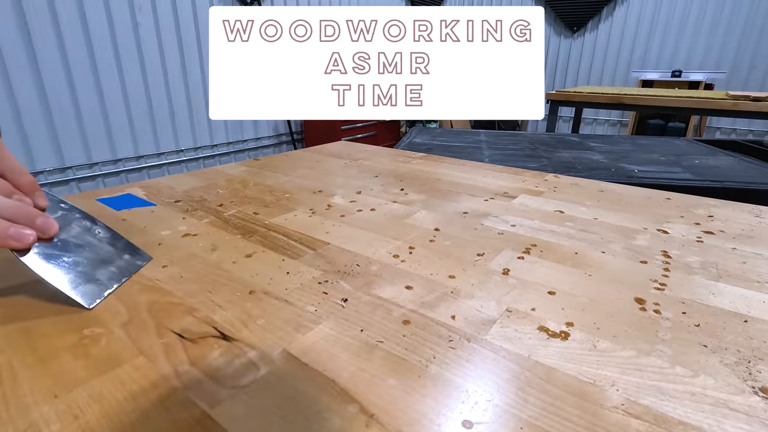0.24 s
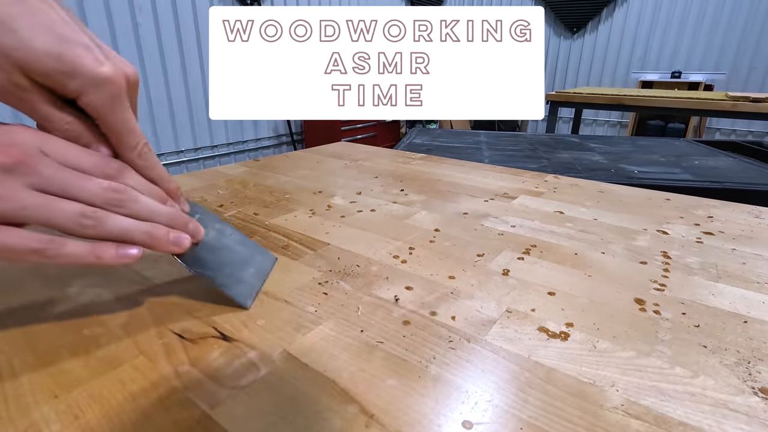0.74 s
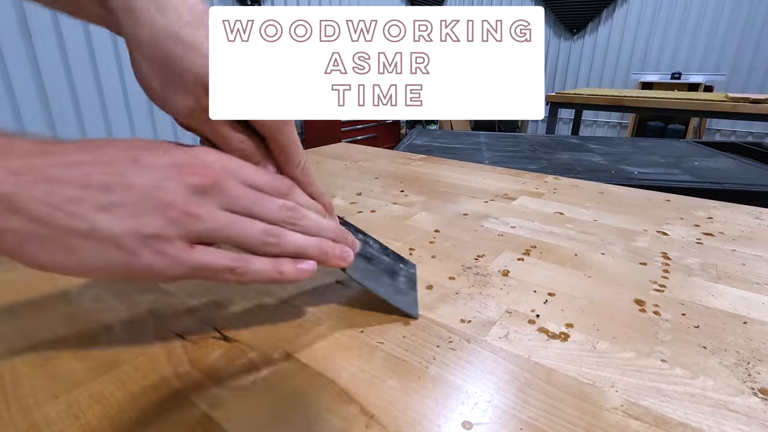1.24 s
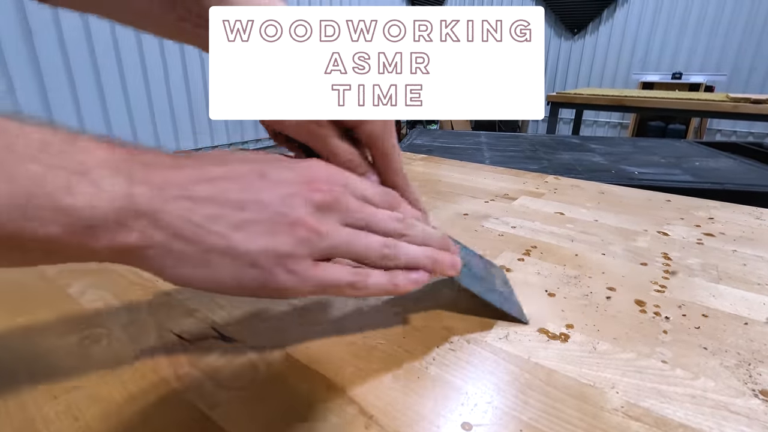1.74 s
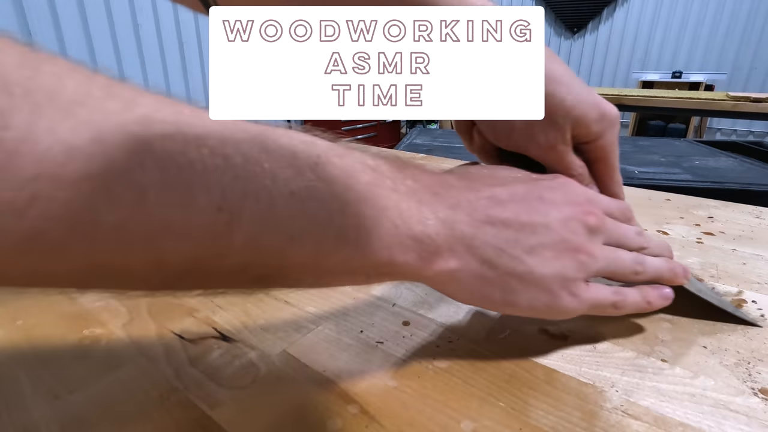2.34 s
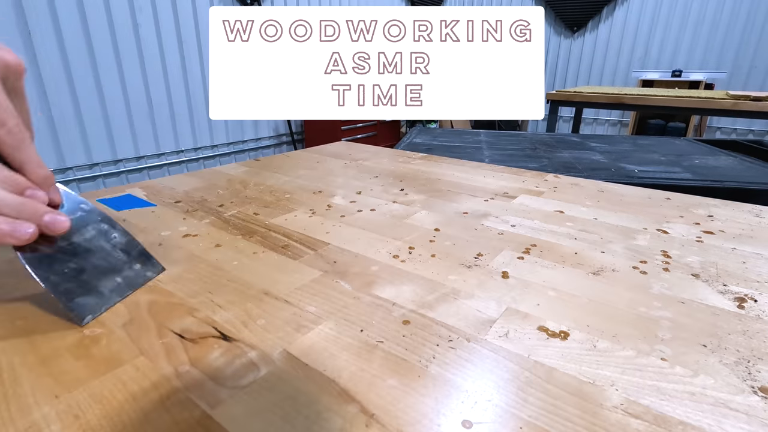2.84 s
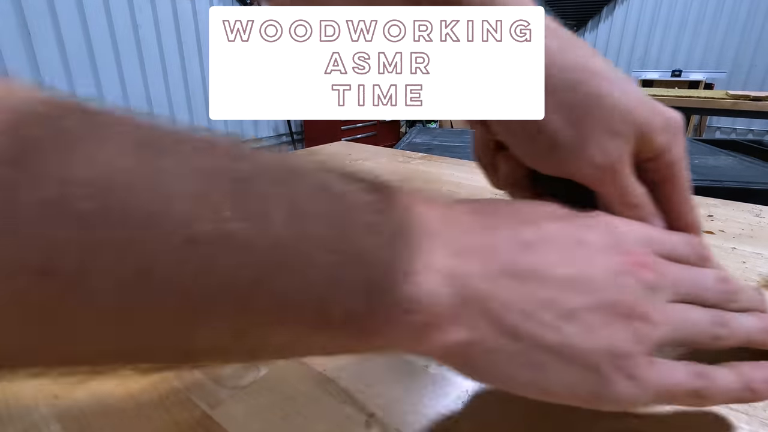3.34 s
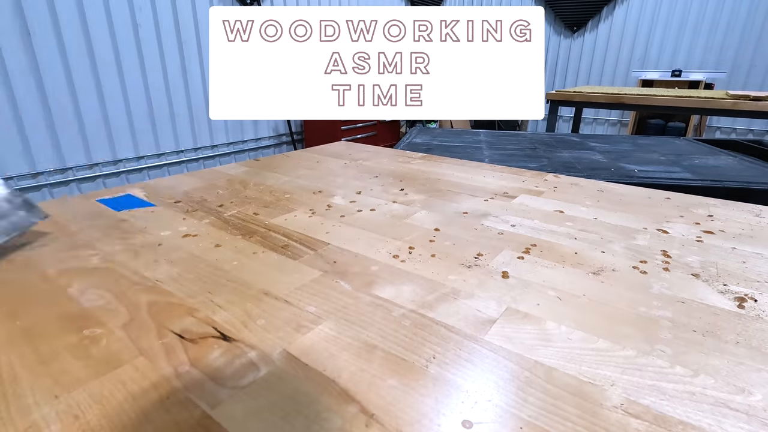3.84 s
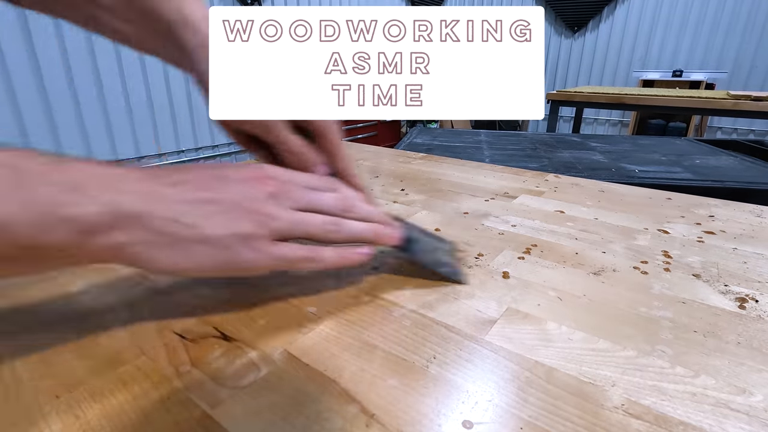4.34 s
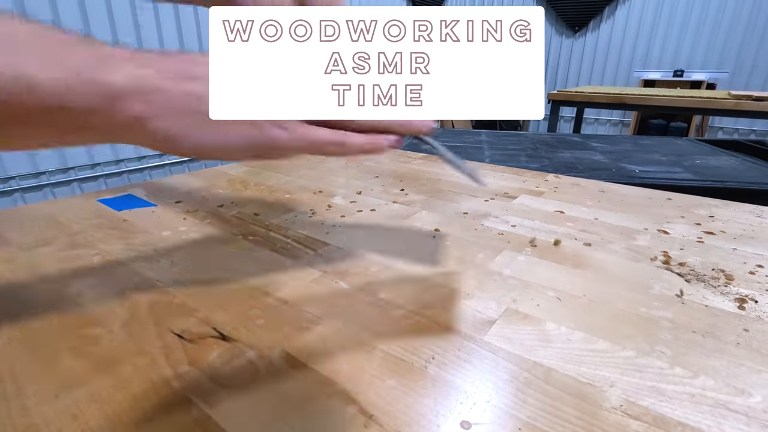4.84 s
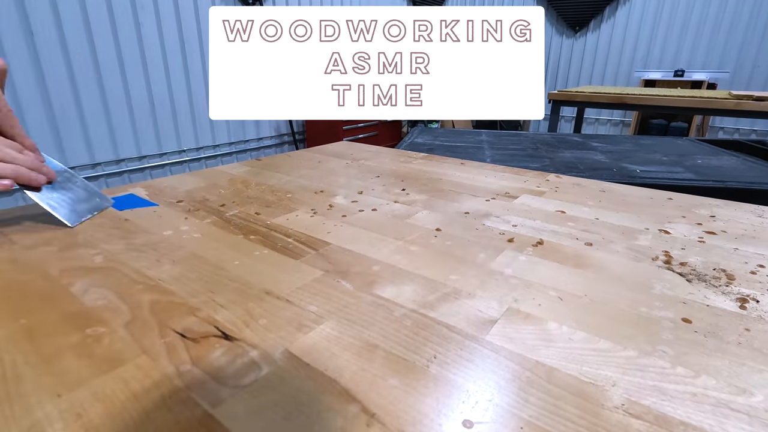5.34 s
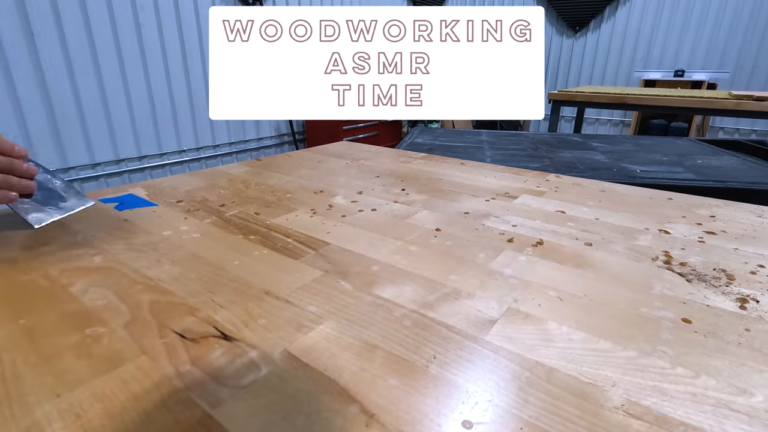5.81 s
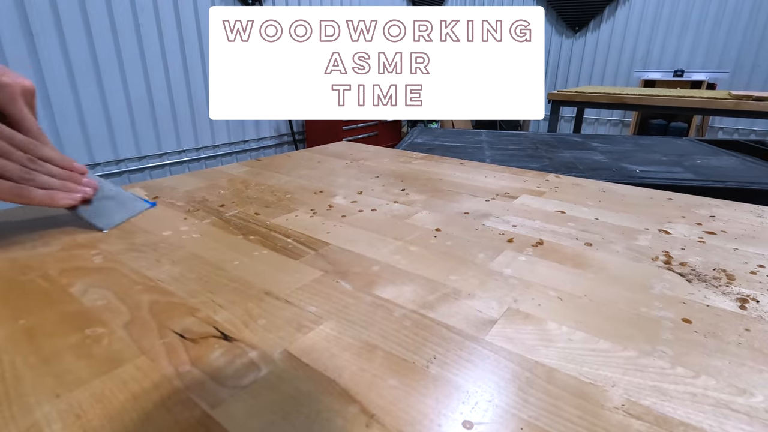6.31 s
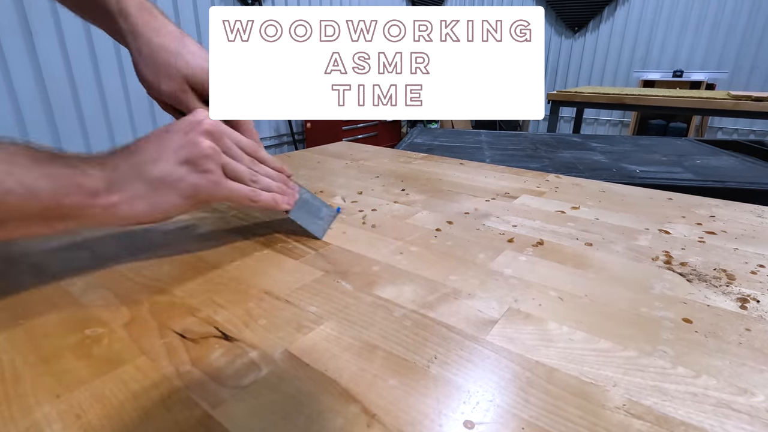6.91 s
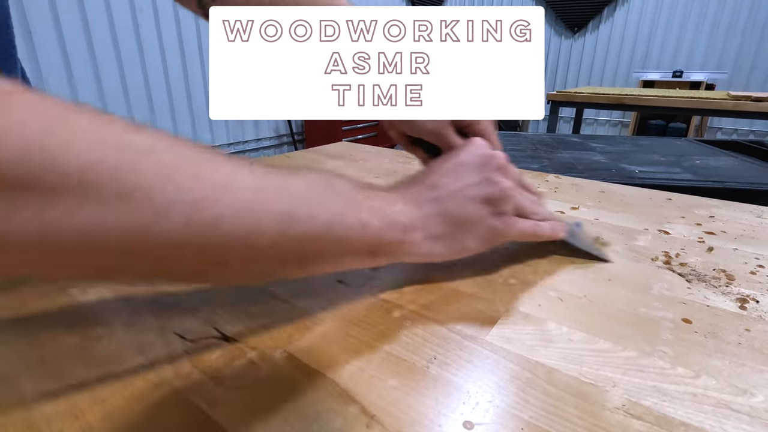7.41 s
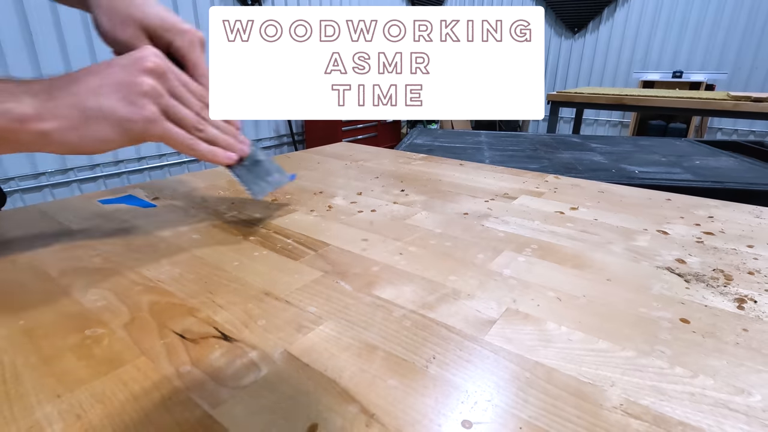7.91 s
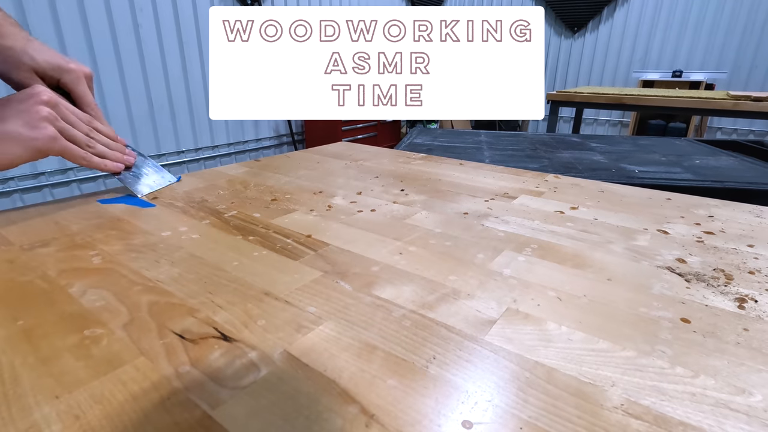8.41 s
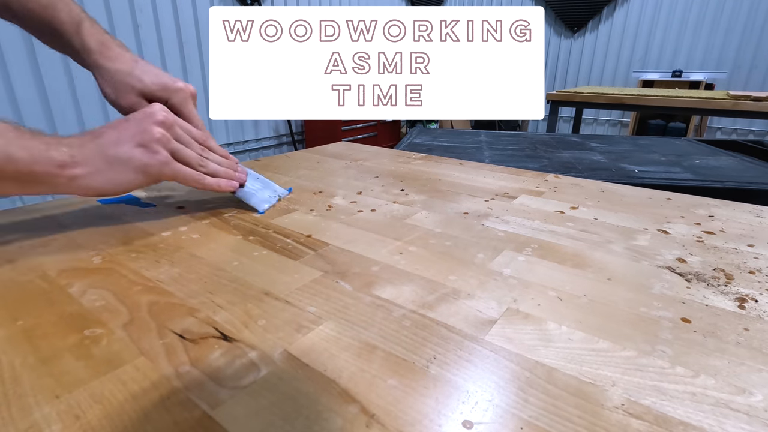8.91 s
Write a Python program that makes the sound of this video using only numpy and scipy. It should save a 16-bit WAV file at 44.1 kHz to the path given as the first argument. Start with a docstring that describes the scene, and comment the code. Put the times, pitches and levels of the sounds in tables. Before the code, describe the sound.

Close single microphone in a quiet workshop. A steel blade scrubs a wooden panel about four times a second, its ringing rasp peppered with glue snaps. Then come two long separate pushes, the second bursting with a dense crackle of cracks and knocks. After a near pause with a light skim, slower, stronger scrubbing resumes, stops, and briefly starts again. Faint ventilation and a soft room tail lie underneath.

```python
"""A steel hand scraper is pushed to and fro over a glued wooden panel, close to a single microphone.
The edge is random noise that grows with the hand's speed and is filtered by the blade's ringing modes.
Beads of dried glue snap off: each one cracks, ticks the steel and knocks the panel's modes.
The bench sways as very deep noise, ventilation hums faintly, and the room adds a short tail."""
import sys
import numpy as np
from scipy import signal
from scipy.fft import rfft, irfft, next_fast_len
from scipy.io import wavfile
from scipy.ndimage import map_coordinates

SR = 44100
rng = np.random.default_rng(int(sys.argv[2]) if len(sys.argv) > 2 else 0)


def put_to_file(sound):
    """Save the sound as 16-bit audio at rate SR, in the file named by the first command-line argument."""
    columns = np.atleast_2d(sound).T  # one column per channel
    safe = np.clip(columns, -1, 1)
    whole_steps = np.round(safe * 32767)
    wavfile.write(sys.argv[1], SR, whole_steps.astype(np.int16))


N = 403956  # length in samples

# All levels below are relative; later gains set the final loudness.
# Scrubbing, one push and its lighter return. Each row: start in seconds, length in seconds,
# push level in dB, return level in dB, freedom of the blade to ring in dB.
SCRUB_CYCLES = [(-0.165, 0.25, -42, -43, -7.5), (0.083, 0.24, -38, -43.5, -9), (0.325, 0.243, -38, -42, -4),
                (0.569, 0.24, -38.5, -42.5, 1), (0.822, 0.24, -33.5, -45.5, 4),
                (1.071, 0.23, -34, -43.5, 3), (1.307, 0.24, -36, -41.5, 6), (1.554, 0.24, -35, -43.5, 6),
                (1.805, 0.23, -35, -42.5, 5.5), (2.045, 0.24, -31.5, -43, -1.5),
                (5.996, 0.35, -34, -40, -11), (6.346, 0.328, -32, -41, -0.5), (6.672, 0.35, -31, -40, 1),
                (7.022, 0.33, -29.5, -39.5, 6.5), (8.504, 0.26, -43, -45, -7), (8.807, 0.36, -33, -40, -4)]
# Single pushes without a return. Each row: start in seconds, fastest moment in seconds,
# end in seconds, level in dB, freedom in dB.
SINGLE_PUSHES = [(2.284, 2.352, 2.49, -39.5, 6), (2.883, 3.16, 3.495, -32.5, 2),
                 (4.002, 4.29, 4.734, -30.5, 2), (7.342, 7.482, 7.65, -33, 3.5)]
# The slack edge skims without biting. Each row: start in seconds, fastest moment in seconds,
# end in seconds, level in dB.
SKIMMING_FLICKS = [(2.509, 2.562, 2.6, -42.5), (4.725, 4.773, 4.797, -44.5), (5.305, 5.405, 5.467, -36),
                   (5.682, 5.794, 5.95, -56.5), (7.6, 7.672, 7.695, -44)]
# The hold on the blade, slackening later on. Each row: time in seconds, blade pitch as a ratio to usual.
GRIP_OVER_TIME = [(0, 1), (4.5, 1.005), (6, 0.99), (9, 0.975)]
# The blade's modes, damped by the fingers. Each row: usual pitch in Hz, usual width in Hz,
# level in dB, dB gained per dB of freedom.
BLADE_MODES = [(3230, 60, 1.5, -0.1), (4240, 110, -10, -0.9), (5560, 50, 0, 1.1), (8600, 160, 1.5, 0.5),
               (1830, 150, -13, 0.3), (6000, 260, -13, -0.9), (7080, 100, -13, 1.2), (8900, 700, -13, 0.3),
               (10200, 170, -14, 0.9), (12300, 130, -3, 0.2), (14400, 500, -6, 0.5)]
# Spectrum of the rubbing edge. Each row: frequency in Hz, strength in dB per Hz.
RASP_SPECTRUM = [(80, -5), (300, -13), (700, -11.5), (1100, -7), (1800, -7.5), (2600, -8), (3200, -3),
                 (4500, -4.5), (6500, -5.5), (8800, -7.5), (11000, -10.5), (14000, -9.5), (16000, -21.5)]
# Faint tones that glide with each stroke. Each row: multiple of the lowest pitch, level in dB.
GLIDING_TONES = [(1, -19.5), (2, -31.5), (3, -22)]
# Slow rocking of the bench. Each row: time in seconds, level in dB.
SWAY_LEVELS = [(0.0, -25), (0.74, -39.5), (0.89, -45), (1.89, -26), (2.47, -42.5), (2.55, -31.5),
               (4.41, -54.5), (4.9, -22), (5.59, -23.5), (5.81, -41), (7.02, -33), (7.09, -29.5),
               (8.14, -22.5), (9.16, -38.5)]
# Spectrum of the workshop's ventilation. Each row: frequency in Hz, strength in dB per Hz.
VENTILATION_SPECTRUM = [(40, -7), (65, -13.5), (120, -2.5), (170, -5), (250, -1), (320, -9), (800, -10.5),
                        (1500, -15.5), (3000, -22.5), (6000, -28), (10000, -35.5), (16000, -41.5)]
# How fast the room's tail dies. Each row: frequency in Hz, time to fall 60 dB in seconds.
ROOM_DECAY = [(100, 0.29), (1000, 0.91), (8000, 0.9), (16000, 0.87)]
# Glue beads breaking off. Each row: time in seconds, knock level in dB, depth (thud over knock) in dB,
# sharpness (steel tick over knock) in dB, thud pitch in Hz.
GLUE_SNAPS = [(0.145, -39.5, -17.5, 6, 216), (0.171, -30.5, -17, -1, 190), (0.413, -40.5, -30, 13, 220),
              (0.669, -44, -25.5, 9, 210), (0.949, -48, -2, 13, 226), (1.131, -25, -8, 7, 176),
              (1.176, -33, -0.5, -15.5, 150), (1.366, -26.5, -16, 4.5, 197), (1.624, -22.5, -1.5, 5, 99.2),
              (1.858, -24, -13, 1, 218), (2.1, -39.5, -15.5, 12.5, 198.6), (2.118, -28, -8, -16.5, 195),
              (2.141, -32.5, 1.5, -6, 148), (2.361, -30.5, -9.5, 13, 330), (2.371, -26, -16, 2, 310),
              (3.164, -31.5, -23, 3, 210), (3.245, -33.5, -3.5, 3.5, 237), (4.215, -28.5, -14, 6.5, 170),
              (4.227, -19.5, -14, -13.5, 159), (4.232, -25, -6, 2, 158), (4.272, -24, -17, -8.5, 179.9),
              (4.285, -27, -25.5, 4, 190), (4.301, -24.5, -14.5, 9, 180), (4.308, -30.5, -17.5, 8.5, 234),
              (4.375, -22, -12.5, -1.5, 285), (4.385, -28.5, -4.5, 12, 272.3),
              (4.403, -36, -14.5, 17.5, 280), (4.437, -28, -21, 5.5, 190), (4.473, -27.5, -1, 4.5, 223),
              (4.496, -25, -3, 1.5, 274), (4.602, -28.5, -3.5, 0.5, 220), (4.634, -32, -3.5, -19, 257),
              (5.409, -38, 8, -3.5, 200), (6.068, -38.5, 8.5, -2.5, 161), (6.108, -37.5, -28, 9, 120),
              (6.271, -52, -45, 8.5, 130), (6.449, -25.5, -1, -3, 217), (6.492, -32, -4, 4.5, 160),
              (6.755, -38.5, -18, 9, 190), (6.765, -27, -22.5, 4.5, 210), (6.783, -24.5, 4, 4.5, 163),
              (6.808, -20, -11, 2, 233), (7.125, -39.5, -32, 21, 243), (7.171, -35, -10, 11, 252),
              (7.44, -32.5, -12, 6.5, 313), (7.45, -31, -10.5, -1, 302), (7.526, -35.5, -23, -3.5, 260),
              (7.535, -23, -10, -10.5, 316), (8.809, -46.5, 4, -4, 147), (8.898, -36, -28, 9.5, 260),
              (8.924, -28.5, -22, 0, 210)]
# The edge lightly touches the panel. Each row: time in seconds, knock level in dB.
EDGE_TOUCHES = [(2.89, -48.5), (3.52, -55), (3.969, -52), (5.224, -52), (8.392, -60)]
# The panel's modes on its bench. Each row: usual pitch in Hz, usual level in dB,
# time to fall 60 dB in seconds.
PANEL_MODES = [(91.3, -0.5, 0.51), (147, -2, 0.22), (179.4, -6.5, 0.34), (211, -3, 0.12), (274, -5, 0.27),
               (380, -5.5, 0.15), (465.4, -3.5, 0.22), (532.7, 2, 0.098), (650, -10, 0.21), (704, 3, 0.14),
               (769, -7, 0.13), (944, -18, 0.18), (957, 2, 0.13), (1192, 6.5, 0.085), (1310, -6.5, 0.25),
               (1450, -5, 0.081), (1829, 10.5, 0.12), (1866, 2.5, .07), (2140, -9.5, .06)]
# Spectrum of splitting glue. Each row: frequency in Hz, strength in dB per Hz.
CRACK_SPECTRUM = [(200, -34), (900, -2), (1500, 1), (2200, -3), (3300, -5), (5000, -18), (9000, -18.5),
                  (16000, -31)]

TOP_HZ = 15900  # band limit of the recorder
PUSH_SHARE = 0.59  # part of a scrubbing cycle spent pushing
OVERLAP_S = 0.012  # the edge still creeps while the hand turns
# Stroke pressure is its level over the usual one; it tilts the spectrum and stiffens the blade.
USUAL_STROKE_DB = -38
RASP_SLOPE, FIZZ_SLOPE = -0.6, 0.2  # dB of low rasp and of top fizz per dB of pressure
GRIP_SLOPE = 0.0014  # pitch ratio gained per dB of pressure
FINGER_DAMPING = 0.5  # a tightly held blade has wider modes: dB of width per dB of freedom lost
BLADE_RING_DB, SKIM_GRIP = 5.5, 0.85  # ring of a biting blade; pitch ratio of a skimming one
BEND_PER_S, BEND_TURNS = 0.09, 0.4  # pitch bend per second of stroke, and its part of a sine turn
USUAL_KNOCK_DB = -30
KNOCK_HZ, KNOCK_HZ_PER_DB, KNOCK_SCATTER = 770, -5, 0.1  # a harder knock is lower; scatter is log pitch
CRACK_SLOPE = -0.63  # a deep bite splits the glue less: dB of crack per dB of depth
TOUCH_DEPTH_DB, TOUCH_SHARP_DB, TOUCH_HZ = -27, 1, 213
HAND_LOAD = 0.012  # random shift of the panel's modes, as a fraction of their pitch


def amp(db):
    """Turn decibels into gain."""
    return 10 ** (np.asarray(db) / 20)


def unit(x):
    """Scale a sound to rms 1."""
    return x / np.sqrt(np.mean(x ** 2) + 1e-20)


def opening(x, span):
    """Scale a hit to rms 1 over its first span seconds."""
    return x / np.sqrt(np.mean(x[:round(span * SR)] ** 2) + 1e-20)


def along(points, hz):
    """Read a curve of (Hz, value) points on a log frequency axis."""
    f, value = np.transpose(points)
    return np.interp(np.log(hz + 1), np.log(f), value)


def wobble(rate, size):
    """A random curve with rate knots a second."""
    knots = rng.standard_normal(int(size * rate / SR) + 2)
    return np.interp(np.arange(size) * rate / SR, np.arange(len(knots)), knots)


def filtered(x, response):
    """Multiply the spectrum of x by a response, given as a function of frequency."""
    m = next_fast_len(len(x) + 1024, True)
    hz = np.fft.rfftfreq(m, 1 / SR)
    return irfft(rfft(x, m) * response(hz), m)[:len(x)]


def noise(spectrum, size):
    """Random noise of rms 1 shaped by a spectrum."""
    return unit(filtered(rng.standard_normal(size), lambda hz: amp(along(spectrum, hz))))


def add(track, s, x):
    """Mix x into the track from time s on."""
    start = round(s * SR)
    x = x[max(-start, 0):]
    part = track[max(start, 0):][:len(x)]
    part += x[:len(part)]


def strokes():
    """List every pass: start s, fastest s, end s, level dB, freedom dB, whether it bites."""
    passes = [(*row, True) for row in SINGLE_PUSHES]
    passes += [(*row, 0, False) for row in SKIMMING_FLICKS]
    for start, length, push_db, return_db, free_db in SCRUB_CYCLES:
        turn = start + PUSH_SHARE * length
        for a, b, db in [(start, turn, push_db), (turn, start + length, return_db)]:
            passes.append((a - OVERLAP_S, (a + b) / 2, b + OVERLAP_S, db, free_db, True))
    return passes


def steel(force, grip, ring_db, free_db=0, rasp_db=0, fizz_db=0, spread=1):
    """Force on the edge sounds directly and through blade modes, whose pitch and damping the grip sets."""
    widen = spread * amp(-FINGER_DAMPING * free_db)

    def response(hz):
        ring = 0
        for mode_hz, width, db, gain in BLADE_MODES:
            damping = 1j * hz * width * widen
            ring = ring + amp(db + gain * free_db) * damping / ((mode_hz * grip) ** 2 - hz ** 2 + damping)
        # tilt the lows and the top, leaving the middle almost alone
        tilt = along([(4000, rasp_db), (7000, 0.018), (9000, 0.0073), (12500, fizz_db)], hz)
        direct = amp(along(RASP_SPECTRUM, hz))
        # this response is complex, so unit() can turn its phase as well as scale it
        return unit(amp(tilt) * (direct + amp(ring_db) * ring) * (hz < TOP_HZ))
    return filtered(force, response)


def bent(x):
    """Pressure builds through a stroke and eases near its end; pitch follows, further in a long stroke."""
    bend = BEND_PER_S * len(x) / SR * np.sin(2 * np.pi * BEND_TURNS * np.linspace(0, 1, len(x)))
    return map_coordinates(x, [np.cumsum(1 + bend - bend.mean()) - 1], order=5)


def hollow(t, top_hz=1820, glide_hz=1600):
    """Faint tones glide with each stroke, highest in mid-stroke; glide_hz is their change per second."""
    pitch = top_hz - glide_hz * np.abs(t - t.mean())
    phase = 2 * np.pi * np.cumsum(pitch) / SR
    out = np.zeros(len(t))
    for k, db in GLIDING_TONES:
        # random swelling of both parts makes each tone breathy
        sine = wobble(220 * k, len(t)) * np.sin(k * phase)
        cosine = wobble(220 * k, len(t)) * np.cos(k * phase)
        out += amp(db) * (sine + cosine)
    return out


def scraping(grit_db=3, chatter_db=0.8, skim_db=5, run_up=0.37, swell=2.53, low_db=-4.5, top_db=-3.0,
             gliding_db=1, drag_db=-19):
    """Each stroke speeds up and slows down; rubbing over countless fibres is a noisy force on the blade."""
    out = np.zeros(N)
    rumble = noise([(18, -12.0), (30, -7.0), (45, -2.5), (70, -20), (95, -13), (160, -35.5), (500, -90)], N)
    for start, fastest, end, db, free_db, bites in strokes():
        pressure = db - USUAL_STROKE_DB
        rasp_db, fizz_db = RASP_SLOPE * pressure, FIZZ_SLOPE * pressure
        stiff = np.interp(fastest, *np.transpose(GRIP_OVER_TIME)) + GRIP_SLOPE * pressure
        t = np.arange(start, end, 1 / SR)
        size = len(t)
        swing = np.abs(np.sin(np.interp(t, [start, fastest, end], [0, np.pi / 2, np.pi])))
        # long strokes reach a cruising speed and hold it
        reach = (end - start) / run_up
        effort = amp(db) * np.tanh(reach * swing ** swell) / np.tanh(reach)
        roughness = amp(grit_db * wobble(2500, size) + chatter_db * wobble(120, size))
        force = effort * unit(rng.standard_normal(size) * roughness)
        # the edge first skims, slack and low in pitch; if it bites, pressure stiffens the blade and it rings
        bite = bites * np.interp(t - fastest, [-.16, -.04], [0, np.pi / 2])
        skim = steel(force * np.cos(bite), SKIM_GRIP, skim_db, 0,
                     low_db + rasp_db + 7.5, top_db + fizz_db - 5.5, spread=7.5)
        cut = steel(force * np.sin(bite), stiff, BLADE_RING_DB, free_db, low_db + rasp_db, top_db + fizz_db)
        add(out, start, bent(skim + cut))
        add(out, start, effort * amp(gliding_db + .5 * rasp_db) * hollow(t))
        # the drag of the edge rumbles through the bench
        drag = np.take(rumble, np.round(t * SR).astype(int), mode="wrap")
        add(out, start, effort * amp(drag_db) * drag)
    return out


def room_tail(x):
    """The room answers with decaying noise, in which each frequency dies at its own speed."""
    hz, t, z = signal.stft(rng.standard_normal((SR * 3) // 4), SR, nperseg=256)
    decay = amp(-60 * t / along(ROOM_DECAY, hz)[:, None])
    tail = signal.istft(z * decay, SR, nperseg=256)[1]
    delayed = np.pad(x, (300, 0))  # samples of delay
    return signal.fftconvolve(delayed, tail / np.linalg.norm(tail))[:N]


def sway(rock_db=2):
    """The rocking bench shakes the microphone at the bottom of its range."""
    level_db = np.interp(np.arange(N) / SR, *np.transpose(SWAY_LEVELS))
    shaking = noise([(4, -1.5), (8, 6.0), (14, -8), (22, -26.0), (40, -30), (65, -47), (300, -100)], N)
    return amp(rock_db + level_db) * shaking


def ventilation(level_db=-56):
    """Moving air makes a faint, steady noise, strongest in the lows."""
    return amp(level_db) * noise(VENTILATION_SPECTRUM, N)


def fracture(t, crumble_db, crumble_t60, snap_t60, clump_db=5):
    """Force envelope of one bead: a sharp break, then crumbs giving way in clumps."""
    crumbs = amp(crumble_db - 60 * t / crumble_t60 + clump_db * wobble(500, len(t)))
    return (amp(-60 * t / snap_t60) + crumbs) * (1 - np.exp(-t / 0.000092))


def panel(t, centre_hz, focus_db, reach, dense_db, dense_t60):
    """A blow sets the panel's modes ringing; its spot and hardness favour those near centre_hz."""
    def weight(f):
        nearness = np.exp(-(np.log2((f + 1) / centre_hz) / 0.27) ** 2)
        return amp(along(reach, f) + focus_db * nearness)

    hz, db, t60 = np.transpose(PANEL_MODES)
    signs = rng.choice([-1, 1], len(hz))
    gains = amp(db + rng.normal(0, 3.9, len(hz))) * signs * weight(hz)
    # the weight of the hands shifts the modes a little from blow to blow
    hz = hz * (1 + HAND_LOAD * rng.standard_normal(len(hz)))
    age = t.astype(np.float32)
    modes = 0
    for gain, f, decay_s in zip(gains, hz, t60):
        fading = np.exp(float(-np.log(1000) / decay_s) * age)
        modes = modes + float(gain) * np.sin(float(2 * np.pi * f) * age) * fading
    # between the strong modes lie many weak ones, heard as fading noise
    dense = filtered(rng.standard_normal(len(t)), weight) * amp(-60 * t / dense_t60)
    return opening(modes, 0.027) + amp(dense_db) * opening(dense, 0.044)


def snaps(thud_db=-1, knock_db=-.5, crack_db=-6, steel_db=-1.0, ring_db=4):
    """A breaking bead cracks, rings the blade and the panel's modes; a touch does the same, faintly."""
    out = np.zeros(N)
    t, brief = np.arange(SR // 2) / SR, np.arange(SR // 12) / SR
    touches = [(s, db, TOUCH_DEPTH_DB, TOUCH_SHARP_DB, TOUCH_HZ) for s, db in EDGE_TOUCHES]
    for s, db, depth, sharpness, thud_hz in [*GLUE_SNAPS, *touches]:
        # the whole panel heaves in its lowest modes
        low_reach = [(40, 0.5), (85, -7.5), (200, -4.5), (320, 1), (500, -14.5), (1200, -44), (4000, -86.0)]
        heave = panel(t, thud_hz, focus_db=11, reach=low_reach, dense_db=-4.5, dense_t60=.2)
        heave = heave * (1 - np.exp(-t / 0.00098))
        add(out, s, amp(thud_db + db + depth) * opening(heave, 0.02))
        # the wood around the edge knocks in its middle modes
        knock_hz = KNOCK_HZ + KNOCK_HZ_PER_DB * (db - USUAL_KNOCK_DB)
        knock_hz = knock_hz * np.exp(KNOCK_SCATTER * rng.standard_normal())
        mid_reach = [(170, -26.5), (330, 2.0), (1200, 0.5), (2000, -12.0), (3200, -36.5), (8000, -50.0)]
        wood = panel(t, knock_hz, focus_db=8.0, reach=mid_reach, dense_db=-5.5, dense_t60=0.11)
        wood = wood * (1 - np.exp(-t / 0.0011))
        add(out, s, amp(knock_db + db) * opening(wood, 0.02))
        # the glue splits and crumbles
        breaking = fracture(brief, crumble_db=-13, crumble_t60=0.15, snap_t60=0.023)
        split = noise(CRACK_SPECTRUM, len(brief)) * breaking
        add(out, s, amp(crack_db + db + CRACK_SLOPE * depth) * opening(split, 0.0027))
        # the freed edge springs forward with a bright tick, 1 ms later
        release = fracture(brief, crumble_db=-17, crumble_t60=0.045, snap_t60=0.0036)
        edge = rng.standard_normal(len(brief)) * release
        tick = steel(edge, 1 + 0.0068 * rng.uniform(0, 1.7), ring_db, rasp_db=-6, fizz_db=-1.5)
        add(out, s + .001, amp(steel_db + db + sharpness) * opening(tick, 0.0055))
    return out


def scene():
    """Mix scraper, room, swaying bench and ventilation, alike in both channels."""
    work = amp(-1.9) * scraping() + snaps()
    mono = work + amp(-23) * room_tail(work) + sway() + ventilation()
    return np.array([mono, mono])


def record(dry):
    """The recorder keeps nothing above its band limit."""
    return np.array([filtered(channel, lambda hz: hz < TOP_HZ) for channel in dry])


dry = scene()
out = record(dry)
put_to_file(out)
```